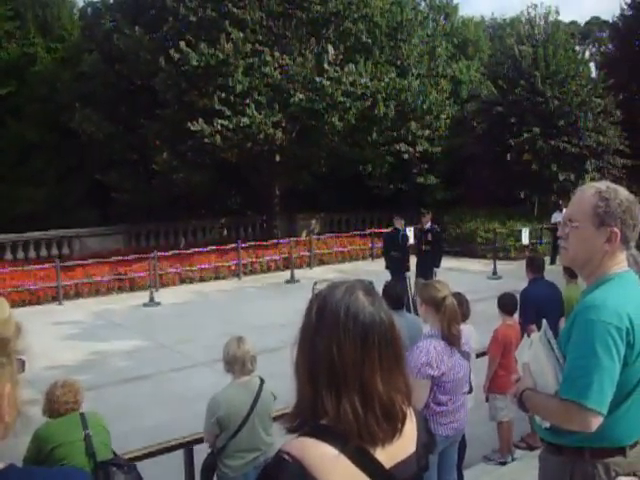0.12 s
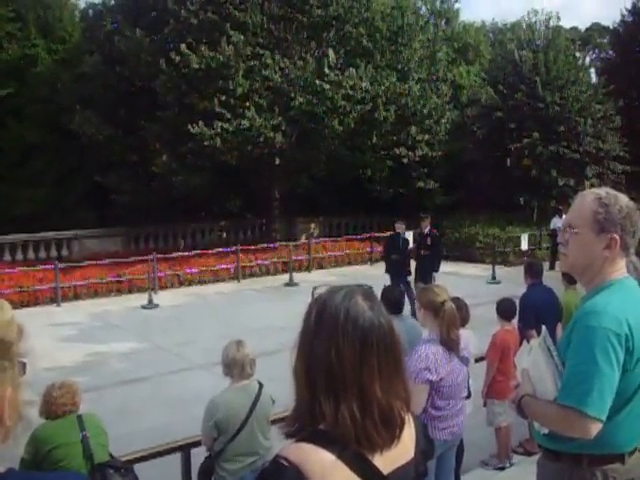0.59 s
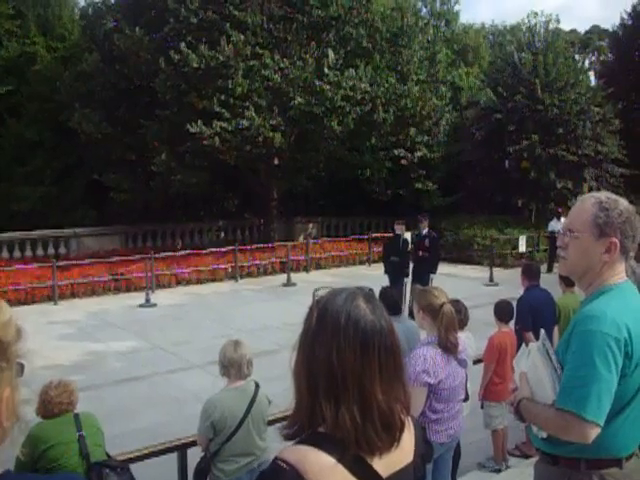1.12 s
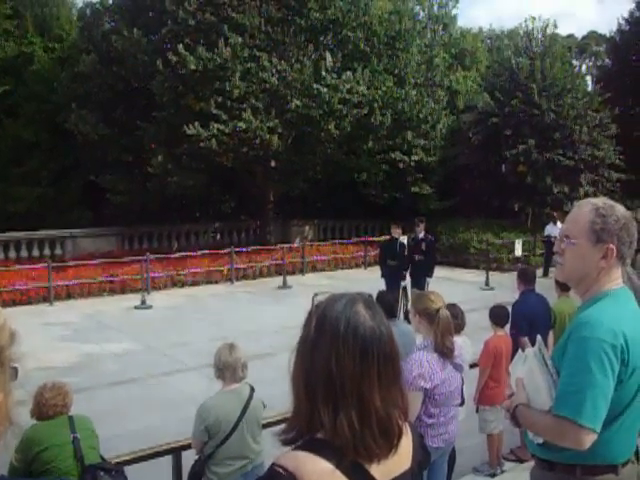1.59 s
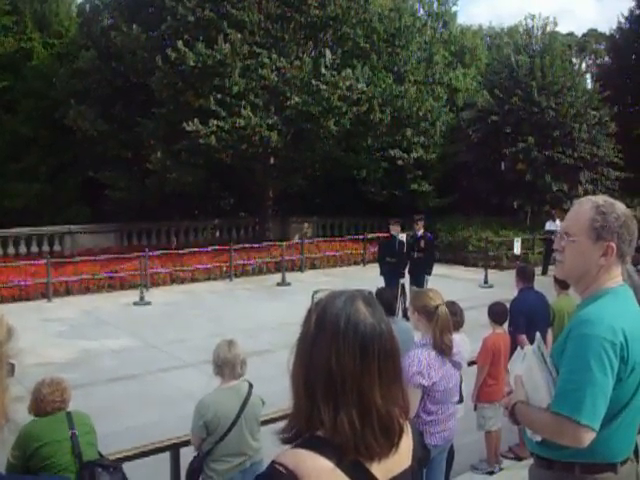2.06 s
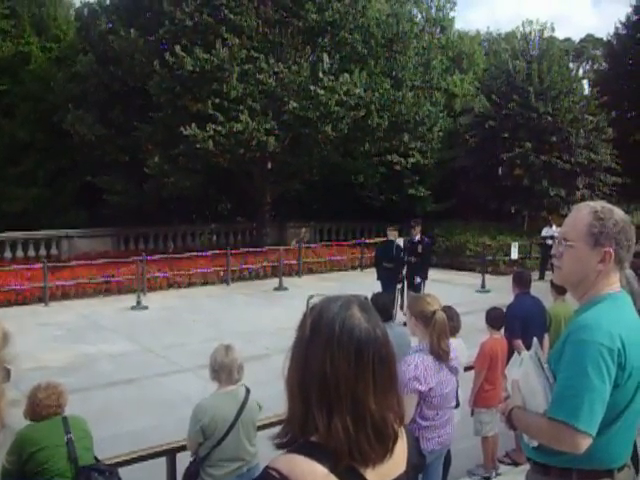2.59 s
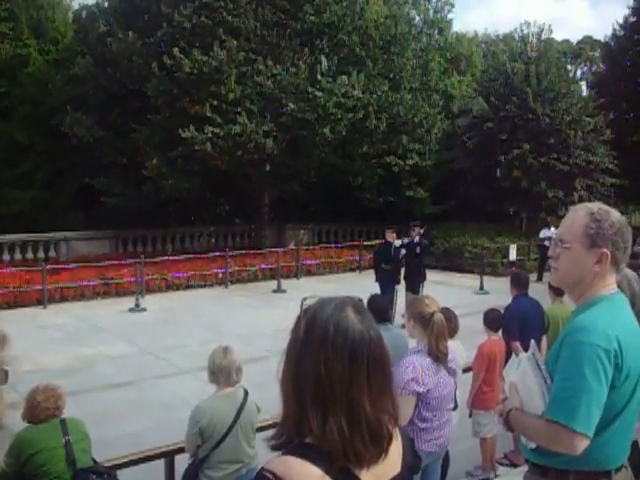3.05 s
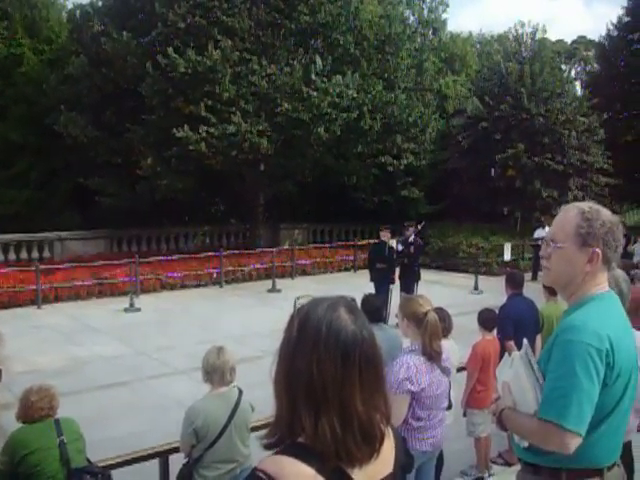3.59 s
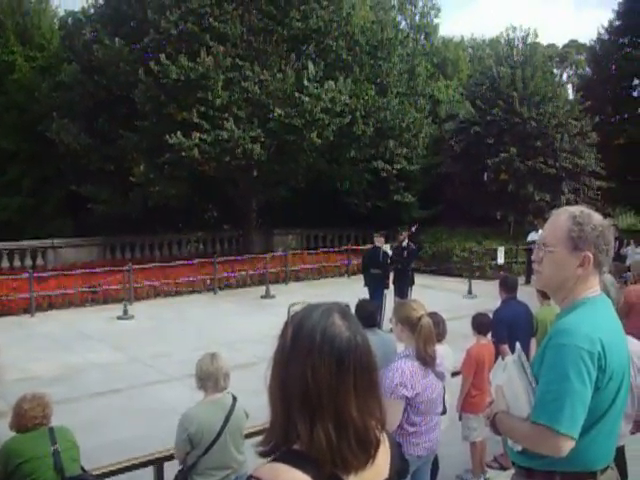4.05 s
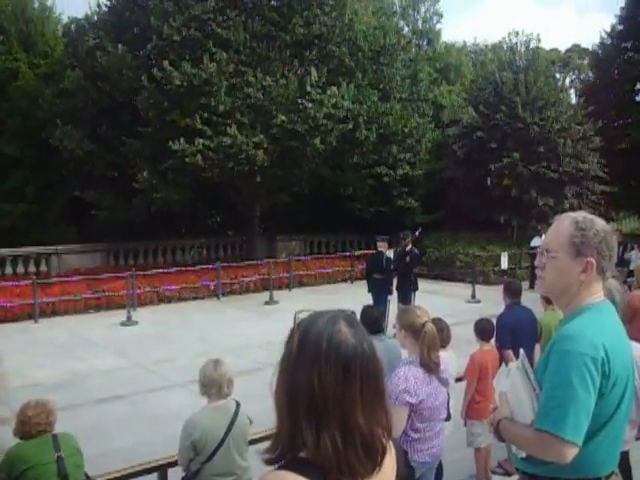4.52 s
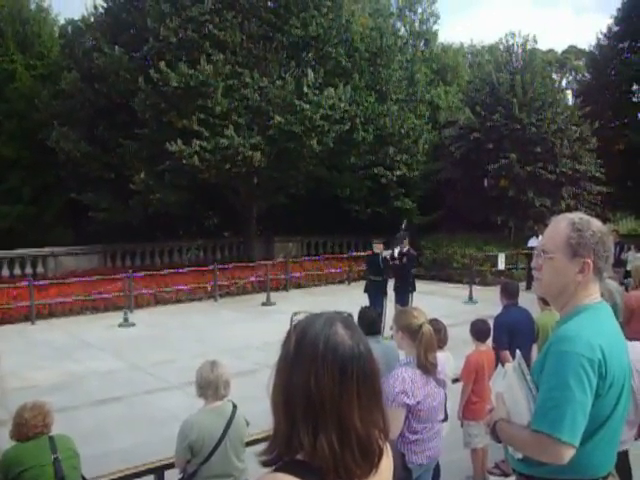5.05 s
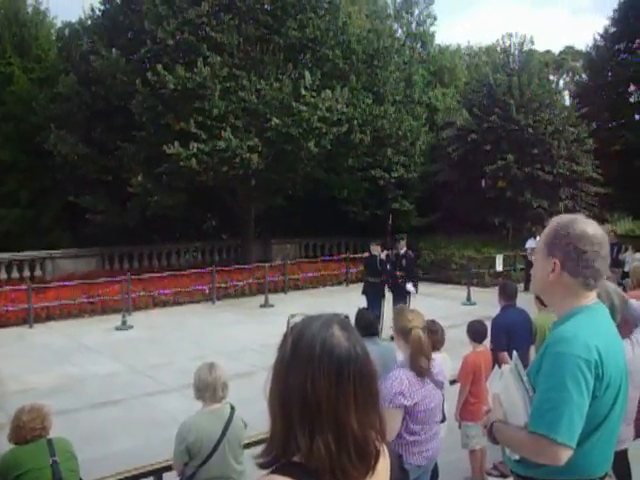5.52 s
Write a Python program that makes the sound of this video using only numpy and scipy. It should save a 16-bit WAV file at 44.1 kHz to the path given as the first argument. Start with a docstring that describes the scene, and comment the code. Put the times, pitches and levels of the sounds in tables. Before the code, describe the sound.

On an open stone plaza, a rifle is handled at a distance. Isolated hard clicks and one wooden slap come first, then a light rattle, a quick metal cluster and a final dense clatter, with short grainy echoes from the walls. Low traffic and leaf rush, faint cricket chirps and a thin electronic whine continue behind. A narrow-band handheld microphone ducks the background with soft thumps after loud hits.

```python
"""A stone plaza: a rifle is slapped, turned and its bolt worked at a distance, and walls send back a short wash.
Blows are sprays of tiny impacts through wood and steel resonances; the slap and the dry close ticks are dying sines.
Cloth and sling rustle as uneven grains. Behind lie shaped noise for distant traffic, leaves and a breathy drone,
a chirping cricket and the recorder's thin whine.
At set times, most of them close to hits, this background sinks with a soft thump and climbs back."""
import sys
import numpy as np
from scipy import signal
from scipy.fft import rfft, irfft
from scipy.io import wavfile

SR = 44100
rng = np.random.default_rng(int(sys.argv[2]) if len(sys.argv) > 2 else 0)


def persist_wave(psi):
    """Save psi, clipped to +-1, as 16-bit WAV."""
    counts = np.round(np.clip(psi, -1, 1) * 32767).astype(np.int16)
    wavfile.write(sys.argv[1], SR, np.atleast_2d(counts).T)


def gain_from_db(level_db):
    """Convert decibel levels to linear amplitude factors (20 dB per decade)."""
    decades = np.asarray(level_db, float) / 20
    return 10 ** decades


N = 249165
TIME = np.arange(N) / SR


def rms_one(x):
    """Scale to rms 1."""
    return x / np.sqrt(np.mean(x ** 2) + 1e-20)


def coloured(x, points):
    """Shape a sound by (f/Hz, level/dB) points joined on a log frequency axis."""
    hz, level_db = np.transpose(points)
    bins = np.maximum(np.arange(len(x) // 2 + 1) * SR / len(x), 1)
    gain = gain_from_db(np.interp(np.log(bins), np.log(hz), level_db))
    return irfft(rfft(x) * gain, len(x))


def drift(rate):
    """Slow random wander: normal steps of spread 1, rate per second, joined by straight lines."""
    steps = rng.standard_normal(400)
    return np.interp(TIME * rate, np.arange(len(steps)), steps)


def resonance(x, hz, width_hz):
    """Two-pole band-pass with a gain of about 1 at its peak."""
    r = np.exp(-np.pi * width_hz / SR)
    poles = [1, -2 * r * np.cos(2 * np.pi * hz / SR), r * r]
    return signal.lfilter([(1 - r * r) / 2, 0, (r * r - 1) / 2], poles, x)


def add(out, sound, s, peak_db):
    """Place a short sound at a time with a given peak."""
    at = round(s * SR)
    scaled = gain_from_db(peak_db) * sound / np.abs(sound).max()
    out[at:at + len(sound)] += scaled[:N - at]


def rush():
    """Distant traffic and leaves as shaped noise below, a smooth hiss above, both wavering a little."""
    # rumble and rustle spectrum: (f/Hz, relative level/dB)
    rush_colour = [(12, -41), (20, -2.5), (54, -0.5), (113, -1), (332, -10.5), (412, -16), (608, -14),
                   (841, -18.5), (1240, -21.5), (1440, -29.5), (1750, -33.5), (2480, -33.5), (3500, -37.5),
                   (4550, -61), (7700, -120)]
    # hiss spectrum: (f/Hz, relative level/dB)
    hiss_colour = [(1500, -9.5), (2500, -6.5), (3600, -4), (4300, 3.5), (5150, -4.5), (5700, -15),
                   (6400, -5), (9000, -6.5)]
    # slow swell of both layers: (t/s, rush rms level/dB, hiss rms level/dB)
    swell = [(0, -24, -42.5), (1.2, -23.5, -42), (2.499, -23, -41), (3.998, -23.5, -43),
             (4.702, -22, -39.5), (5.65, -20.5, -35.5)]
    s, rush_db, hiss_db = np.transpose(swell)
    low = rms_one(coloured(rng.standard_normal(N), rush_colour))
    low = low * gain_from_db(np.interp(TIME, s, rush_db) + 0.76 * drift(9.0))
    high = rms_one(coloured(rng.standard_normal(N), [(700, -40)] + hiss_colour))   # little hiss below 700 Hz
    high = high * gain_from_db(np.interp(TIME, s, hiss_db) + 0.2 * drift(19.0))
    return low + high


def drone():
    """A breathy drone that comes and goes in the distance: noise twice through one narrow resonance."""
    # loudness over time: (t/s, level/dB)
    drone_level = [(0, -59.5), (2.9, -58.5), (3.3, -37.5), (3.65, -45.5), (4.3, -51), (5.65, -42.5)]
    drone_hz, pass_width_hz = 1246, 160
    once = resonance(rng.standard_normal(N), drone_hz, pass_width_hz)
    twice = resonance(once, drone_hz, pass_width_hz)
    return rms_one(twice) * gain_from_db(np.interp(TIME, *np.transpose(drone_level)))


def cricket():
    """Soft bell-shaped chirps of one tone at a steady pace, each with its own strength."""
    tone_hz, typical_peak_db = 4025, -44
    first_chirp_s, chirp_gap_s, chirp_s = .004, .08, .022   # chirp length between its 1/e points
    count = np.floor((TIME - first_chirp_s) / chirp_gap_s + .5)
    offset = TIME - first_chirp_s - count * chirp_gap_s
    strength = gain_from_db(typical_peak_db + 1.5 * rng.standard_normal(100)[count.astype(int)])
    bell = np.exp(-(2 * offset / chirp_s) ** 2)
    return strength * bell * np.sin(2 * np.pi * tone_hz * TIME)


def whine():
    """Electrical sine of the recorder whose phase jumps at regular intervals by a wandering amount."""
    whine_hz, rms_db = 3836, -42
    first_slip_s, slip_gap_s = .0532, .06658
    mean_turns, wander_turns, scatter_turns = -.15, .35, .1
    slip_s = np.arange(first_slip_s, TIME[-1], slip_gap_s)
    wander = wander_turns * drift(0.65)[(slip_s * SR).astype(int)]
    scatter = scatter_turns * rng.standard_normal(len(slip_s))
    slipped = np.cumsum(mean_turns + wander + scatter)
    turns = whine_hz * TIME + np.append(0, slipped)[np.searchsorted(slip_s, TIME)]
    return gain_from_db(rms_db) * np.sqrt(2) * np.sin(2 * np.pi * turns)


def dips():
    """Background level in dB, and thumps: offsets in proportion to how far the level falls at each drop."""
    # drops of the background: (t/s, depth/dB)
    drops = [(0.953, 1.5), (1.0455, 7), (1.5282, 7), (2.194, 4.5), (3.589, 0.5), (4.405, 4), (4.424, 16),
             (5.055, 3), (5.14, 12), (5.224, 13)]
    sink_s, recovery_s = .0014, 0.35   # time constants
    thump_s, settle_s = 0.032, 0.61   # time constants
    thump_height = .31   # scale for a drop from full level to silence
    sunk_db, thumps = np.zeros(N), np.zeros(N)
    for s, depth_db in drops:
        after = np.maximum(TIME - s, 0)
        rise = 1 - np.exp(-after / sink_s)
        height = thump_height * gain_from_db(sunk_db[int(s * SR)]) * (1 - gain_from_db(-depth_db))
        sunk_db -= depth_db * rise * np.exp(-after / recovery_s)
        # the offset dies away and swings slowly back past zero
        swing = np.exp(-after / thump_s) - thump_s / settle_s * np.exp(-after / settle_s)
        thumps += height * rise * swing
    return sunk_db, thumps


def rustle():
    """Cloth, sling and sliding parts: dense uneven grains; each movement fades in, holds and fades out."""
    # movements: (start t/s, length/s, level/dB)
    movements = [(1.356, .07, -46.5), (2.896, .12, -41.5), (5.071, 0.067, -37), (5.15, 0.042, -46.5)]
    rise_db_per_s, fall_db_per_s = 1498.5, 255.5
    grains = rng.standard_normal(N) * gain_from_db(1.7 * rng.exponential(1, N))
    grains = grains * (rng.random(N) < 1500 / SR)   # about 1500 grains per second
    level = np.zeros(N)
    for s, length, db in movements:
        fade_in_db = rise_db_per_s * np.maximum(s - TIME, 0)
        fade_out_db = fall_db_per_s * np.maximum(TIME - s - length, 0)
        level += gain_from_db(db - fade_in_db - fade_out_db)
    return rms_one(resonance(grains, 2800, 3500)) * level


def ticks():
    """One small hard object: a click sets its modes ringing; too near to carry echoes."""
    # close ticks: (t/s, peak level/dB, extra ring of the hollow body/dB)
    clicks = [(0.1842, -19, 8.5), (0.9464, -0.5, 2), (1.5277, -4.5, 2), (2.189, -6, 3.5), (2.383, -29, -1),
              (2.889, -21, 8), (3.5865, -8, 4), (4.809, -22.5, -6)]
    # modes of the object: (f/Hz, relative level/dB, t60/s)
    tick_modes = [(739, -22, 0.066), (1802, -17.5, 0.038), (2090, -27.5, 0.026), (2750, -5.5, 0.0072),
                  (4080, -9, 0.0092), (4320, -0.5, 0.0072), (4500, -4.5, 0.0042), (6760, -4, 0.0065)]
    out, t = np.zeros(N), TIME[:4096]
    chance = rng.standard_normal((len(clicks), len(tick_modes)))
    for row, (s, peak_db, body_db) in zip(chance, clicks):
        sound = np.zeros(len(t))
        for c, (hz, level_db, t60) in zip(row, tick_modes):
            mode_db = level_db + body_db * (hz < 2400) + 1.0 * c   # the body rings in the low modes
            sound += gain_from_db(mode_db - 60 * t / t60) * np.sin(2 * np.pi * hz * (1 + 0.013 * c) * t)
        onset = (1 - np.exp(-t / 0.00024)) ** 2   # the contact builds up in under a millisecond
        add(out, -sound * onset, s, peak_db)
    return out


def walls(x):
    """Scattered, grainy echoes that swell as far walls answer, hold, then die."""
    # colour of the wash: (f/Hz, relative level/dB)
    wash_colour = [(400, -5), (1000, 1.5), (2500, -3), (4300, -4.5), (5000, -9), (6500, -17)]
    wash_db, fall_db_per_s = -31.5, 74.5
    rise_s, hold_s = 0.0049, 0.057   # rise time constant; decay starts after the hold
    t = TIME[:SR // 2]
    scatter = rng.standard_normal(len(t)) * gain_from_db(2.7 * drift(120.0)[:len(t)])
    decay = gain_from_db(wash_db - fall_db_per_s * np.maximum(t - hold_s, 0))
    shape = (1 - np.exp(-t / rise_s)) * decay
    return signal.fftconvolve(x, coloured(scatter, wash_colour) * shape)[:N]


def slap():
    """One clean slap sets the modes of the wooden stock ringing; the walls hear one broad knock."""
    # modes of the stock: (f/Hz, relative level/dB, t60/s)
    stock_modes = [(655, -10, 0.066), (748, -11, 0.049), (1190, -5, 0.021), (1343, -7.5, 0.021),
                   (1790, -8, .018), (2500, -7.5, .014), (3640, 0.5, 0.0086), (4350, -9, .006),
                   (5340, 0, 0.006)]
    slap_s, slap_db, echo_db = 1.0443, -4, 0
    out, knock, t = np.zeros(N), np.zeros(N), TIME[:4096]
    sound = np.zeros(len(t))
    for hz, level_db, t60 in stock_modes:
        sound += gain_from_db(level_db - 60 * t / t60) * np.sin(2 * np.pi * hz * t)
    add(out, sound * (1 - np.exp(-t / .0002)), slap_s, slap_db)
    add(knock, resonance(1. * (t == 0), 2100, 6000), slap_s, echo_db)
    return out, knock


def blows():
    """The clear blows, then the chance contacts of loose parts rattling in between."""
    # clear blows on the rifle: (t/s, peak level/dB, centre of colour f/Hz, t60/s)
    contacts = [(2.9786, -15.5, 3000, 0.046), (3.0205, -23, 3550, 0.02), (3.167, -29, 4600, .025),
                (3.8494, -20, 1260, 0.023), (4.0372, -17, 4700, 0.015), (4.0926, -23.5, 4280, .024),
                (4.3653, -8, 3960, 0.044), (4.3765, -5.5, 3500, 0.054), (4.3954, -12, 3500, 0.067),
                (4.4238, -7.5, 3970, 0.03), (5.050, -3, 2600, 0.019), (5.0554, -4, 2600, .05),
                (5.0694, -4.5, 2400, 0.22), (5.0898, -7.5, 3130, 0.027), (5.0934, -5, 2200, .02),
                (5.1103, -7, 2400, 0.014), (5.1214, -8.5, 1670, 0.046), (5.1304, -10.5, 3570, 0.036),
                (5.137, -5.5, 1300, 0.017), (5.2026, -15, 3840, 0.031), (5.2104, -10, 4100, 0.028),
                (5.2164, -16, 3850, 0.026), (5.2814, -26, 3830, .02)]
    # rattles: (start t/s, length/s, typical peak level/dB, centre of colour f/Hz)
    rattles = [(2.96, .07, -23, 3070), (4.381, .045, -20.5, 3500), (5.057, .075, -16.5, 2560),
               (5.15, .05, -21, 2860)]
    contacts_per_s, rattle_t60_s = 130, 0.039
    spread_db, spread_octaves = 3, 0.43
    rows = list(contacts)
    for start, length, peak_db, hz in rattles:
        place, strength, colour = rng.random(24), rng.standard_normal(24), rng.standard_normal(24)
        s = start + (np.arange(len(place)) + place) / contacts_per_s
        for at, a, c in zip(s, strength, np.clip(colour, -2, 2)):
            if at < start + length:
                rows.append((at, peak_db + spread_db * a, hz * 2 ** (spread_octaves * c), rattle_t60_s))
    return rows


def rifle():
    """Each contact is a dying spray of tiny impacts: a broad crack, and a ring in modes nearest its colour."""
    # wood and steel resonances: (f/Hz, width/Hz, relative level/dB)
    rifle_modes = [(836, 150, 3), (1285, 180, 8.5), (1668, 130, 2.5), (2400, 280, -7.5), (2840, 1000, 5),
                   (3500, 590, 7.5), (3865, 110, -4), (4350, 980, -2.5), (5460, 560, -6.5)]
    colour_octaves, crack_db, contact_rise_s = 1.31, -9, 0.00053
    echo_gain_db, echo_db_per_octave, echo_reference_hz = 1.5, 7, 3000   # bright blows echo more strongly
    blow_cut_hz = 450   # little of the rifle radiates below this
    out, knocks, t = np.zeros(N), np.zeros(N), TIME[:4096]
    sprays = rng.standard_normal((120, 4096)) * rng.random((120, 4096)) ** 4
    for spray, (s, peak_db, hz, t60) in zip(sprays, blows()):
        spray = spray * gain_from_db(-60 * t / t60) * (1 - np.exp(-t / contact_rise_s))
        # a dull blow is a soft one
        spray = signal.lfilter(*signal.butter(1, min(0.99 * hz, 9000), fs=SR), spray)
        sound = gain_from_db(crack_db) * resonance(spray, hz, 0.4 * hz) * np.sqrt(SR / hz)
        for mode_hz, width_hz, level_db in rifle_modes:
            away = np.log2(mode_hz / hz) / colour_octaves
            gain = gain_from_db(level_db - 10 * away ** 2) * np.sqrt(SR / width_hz / 10)
            sound += gain * resonance(spray, mode_hz, width_hz)
        add(out, sound, s, peak_db)
        echo_db = peak_db + echo_gain_db + echo_db_per_octave * np.log2(hz / echo_reference_hz)
        add(knocks, resonance(1. * (t == 0), hz, 2 * hz), s, echo_db)   # what the walls hear: one broad knock
    low_cut = signal.butter(2, blow_cut_hz, "high", fs=SR, output="sos")
    return signal.sosfilt(low_cut, out), knocks


def scene():
    """Hits and their echoes, ticks and rustles over the sinking background."""
    sunk_db, thumps = dips()
    hits, knocks = np.add(rifle(), slap())
    background = gain_from_db(sunk_db) * (rush() + drone() + cricket() + whine())
    return (hits + walls(knocks) + ticks() + rustle() + background + thumps)[None]


def band_limit(x):
    """A steep low-pass at the top of the band."""
    return signal.sosfilt(signal.butter(12, 7340, fs=SR, output="sos"), x)


def record(dry):
    """A narrow-band recorder: a ringing microphone port, rounded peaks and a steep treble roll-off."""
    port_hz, port_width_hz, port_gain = 5600, 390, 0.2
    ceiling = 1.4   # the rounded peaks stay below this
    ported = dry + port_gain * resonance(dry, port_hz, port_width_hz)
    rounded = ceiling * np.tanh(ported / ceiling)
    soft = signal.sosfilt(signal.butter(8, 6680, fs=SR, output="sos"), rounded)
    steep = signal.sosfilt(signal.cheby2(10, 60, 7500, fs=SR, output="sos"), soft)
    return band_limit(steep)


dry = scene()
out = record(dry)
persist_wave(out)
```